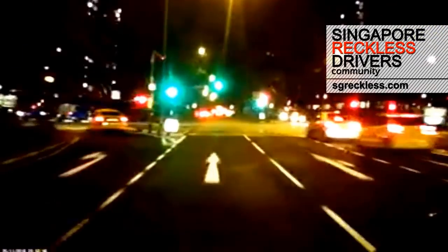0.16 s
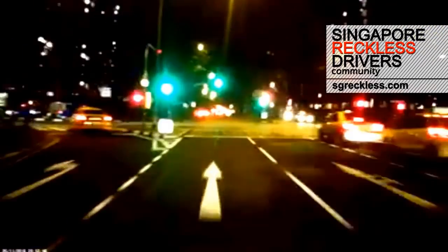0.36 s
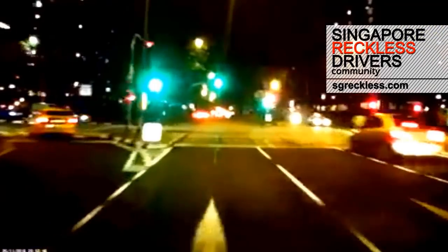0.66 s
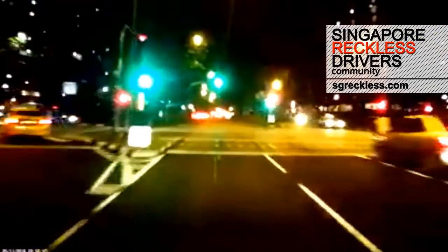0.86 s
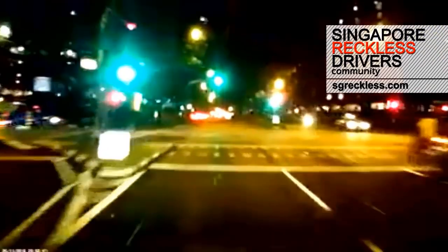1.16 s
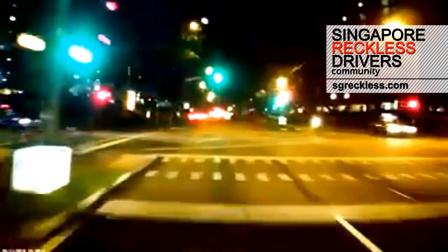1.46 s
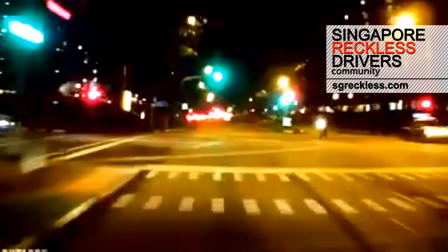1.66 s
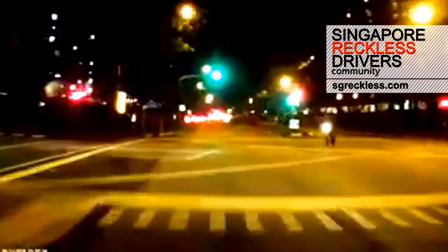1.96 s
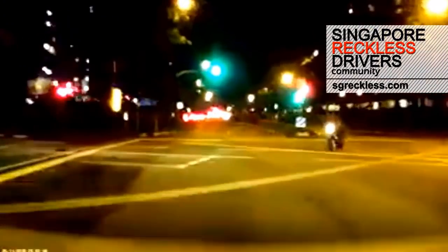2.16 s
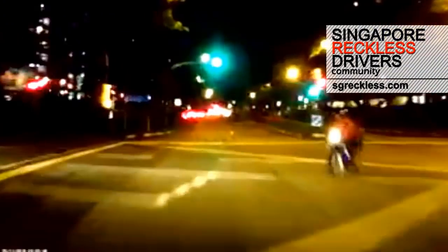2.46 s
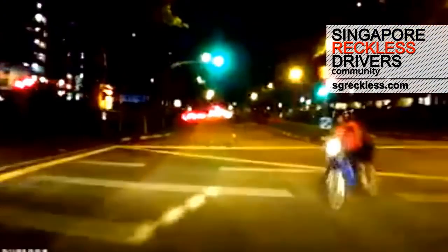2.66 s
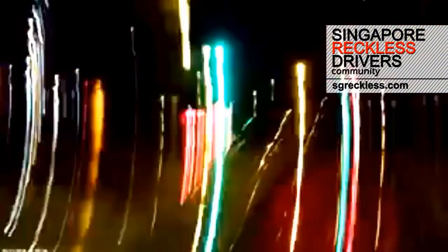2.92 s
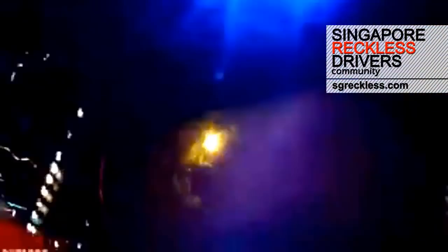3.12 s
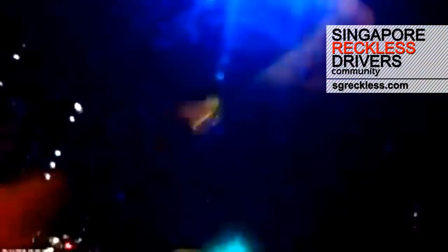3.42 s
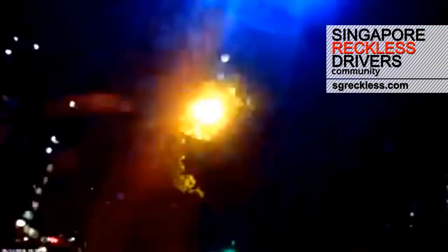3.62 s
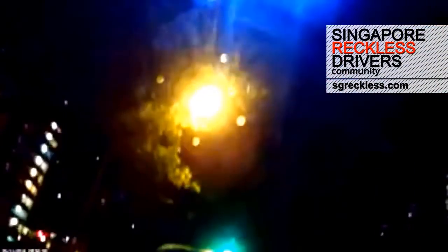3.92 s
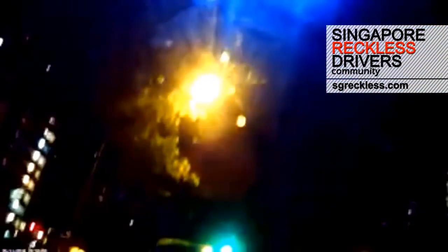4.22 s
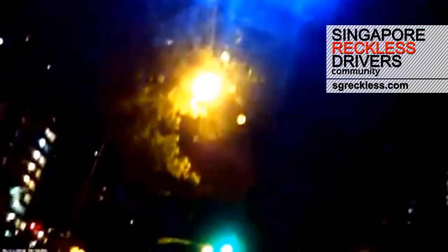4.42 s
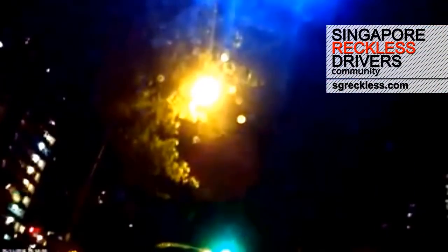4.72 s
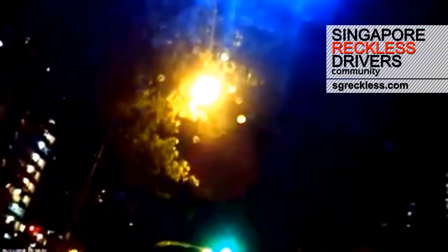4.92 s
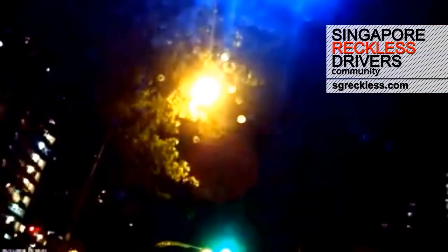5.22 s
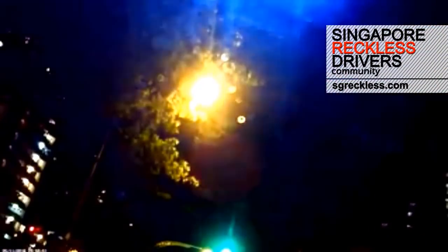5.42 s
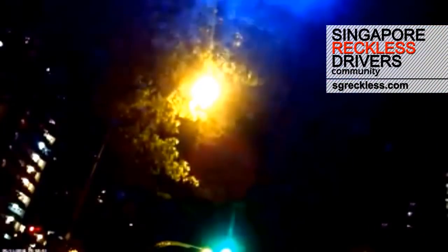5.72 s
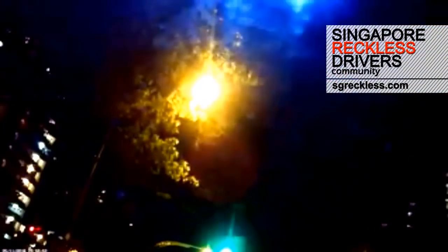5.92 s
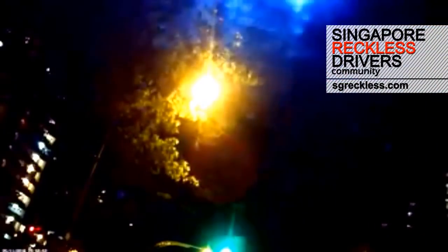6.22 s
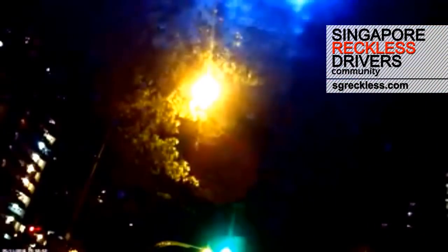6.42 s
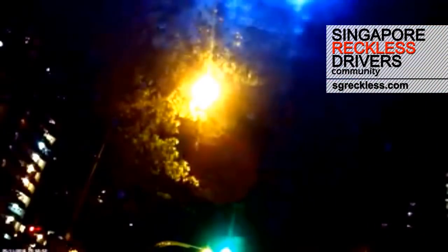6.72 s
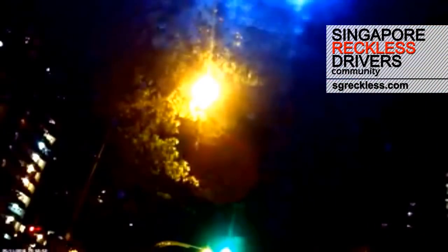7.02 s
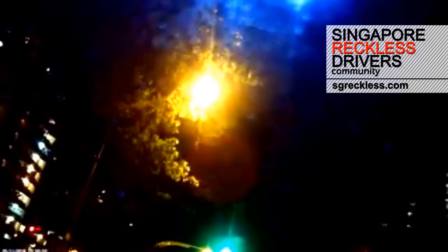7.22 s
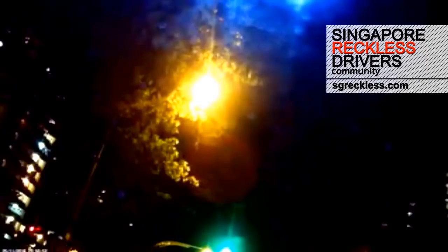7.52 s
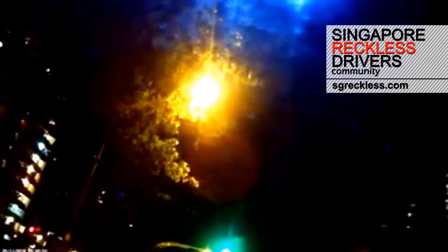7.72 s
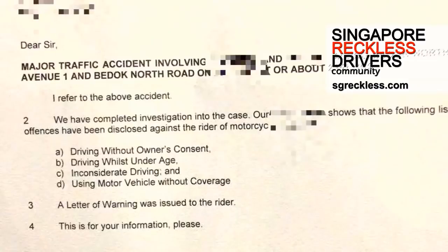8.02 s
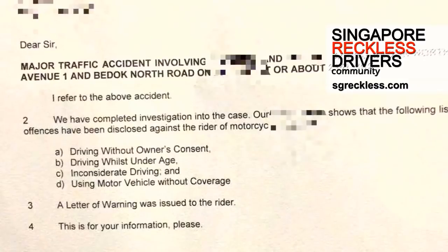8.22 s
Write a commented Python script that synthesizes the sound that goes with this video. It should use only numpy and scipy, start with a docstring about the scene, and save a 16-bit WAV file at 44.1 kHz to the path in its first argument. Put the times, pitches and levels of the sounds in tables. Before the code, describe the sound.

From inside a moving car, a steady low engine drone and road rumble are heard, with a faint high electronic whine and hiss throughout. A few deep thuds come from 3.3 seconds, and at 3.8 the tyres squeal briefly and start grinding. At about 4.1 seconds a very loud collision hits: rapid booming blows overload the microphone while panels crack, crumple and spray splinters. Around 4.8 seconds hard parts strike the windscreen three or four times, sharply. Heavy thuds and deep shuddering continue, with more short tyre squeals from 5.0 to 5.5. Loose objects tumble with hollow knocks as the car halts near 6 seconds. It is then much quieter: a fading low rumble as the car rocks, a soft idling throb and faint ticks of debris. Small plastic snaps and a soft bump come just before the sound ends at about 8 seconds.

```python
"""A car hits a motorcycle at a night-time junction, heard from a small camera on the windscreen.
First engine and road drone in the cabin, with the whine of the camera's electronics that lasts throughout.
The car brakes and its tyres squeal by stick-slip friction. Blows then excite the body's low modes and
overload the microphone, while panels crumple and fracture and hard parts crack against the glass.
Loose things tumble as the car stops; at last it rocks on its springs, the engine idles and debris settles."""
import sys
import numpy as np
from scipy import signal
from scipy.fft import rfft, irfft
from scipy.io import wavfile
from scipy.ndimage import uniform_filter1d

SR = 44100
rng = np.random.default_rng(int(sys.argv[2]) if len(sys.argv) > 2 else 0)


def generate_wav(sig):
    """Save sig (samples, or channels by samples) to the path in sys.argv[1] as 16-bit PCM at SR."""
    pcm = np.round(np.clip(np.atleast_2d(sig).T, -1, 1) * 32767).astype(np.int16)
    wavfile.write(sys.argv[1], SR, pcm)


N = 369116
TIME = np.arange(N) / SR
BRAKE_S, IMPACT_S, HALT_S, END_S = 3.8, 4.15, 5.95, 8.065

# Impacts: start_s, level_db
BODY_BLOWS = [(.63, -31.5), (3.690, -22), (4.060, 6.5), (4.103, 10), (4.160, 1), (4.226, 4.5), (4.331, 6),
              (4.412, -4.5), (4.675, -4), (4.778, -7), (6.3, -34), (6.865, -35), (7.938, -29)]  # bumps and heavy blows on the body
PANEL_FRACTURES = [(4.0765, -9), (4.112, -19), (4.135, -8), (4.1445, -14), (4.1865, -1.5), (4.190, -2.5),
                   (4.2005, -17), (4.2125, -5), (4.2275, -7), (4.3312, -10), (4.347, -15)]  # panels breaking
GLASS_STRIKES = [(4.7777, -1), (4.8221, -2.5), (4.8551, -3), (4.8835, -12.5)]  # hard parts striking the windscreen
CABIN_KNOCKS = [(.645, -41.5), (3.592, -33), (3.692, -18.5), (4.110, -4), (4.19, -6.5), (4.414, -17),
                (4.594, -16), (4.651, -20), (4.698, -13), (5.782, -14.5), (5.862, -18), (5.887, -19.5),
                (5.902, -20), (5.955, -16), (6.0, -25), (6.578, -47.5), (7.936, -40)]  # loose things knocking in the cabin
TRIM_SNAPS = [(3.690, -36.5), (5.599, -34), (5.617, -41), (6.895, -57), (7.255, -55), (7.596, -51),
              (7.671, -40.5), (7.899, -43.5), (7.930, -42)]  # small plastic parts snapping
# Deep thuds of suspension and floor: start_s, pitch_hz, level_db
FLOOR_THUDS = [(3.28, 31.7, -8.5), (3.44, 110, -25.5), (3.598, 112.4, -11), (3.934, 60.5, -6),
               (4.917, 56.4, -4), (5.044, 109, -11), (5.13, 67.4, -5), (5.19, 112, -7.5),
               (5.248, 124, -6.5), (5.319, 53.4, -3.5), (7.930, 87.3, -20), (7.933, 293, -31)]
# Strikes on a metal part: start_s, level_db, t60_s
METAL_STRIKES = [(3.692, -50, 1.0), (4.86, -54.5, 3.4)]
# Panels folding and scraping: start_s, hold_s, level_db
PANEL_FOLDS = [(3.815, .015, -41), (3.904, .14, -43), (4.14, .32, -35), (4.253, .025, -25.5),
               (4.48, .015, -30), (4.699, .015, -30), (4.797, 0.092, -41.5), (5.752, 0.017, -36)]
# Tyre squeals: start_s, span_s, nominal_pitch_hz, level_db, pitch_scatter_ratio
TYRE_SQUEALS = [(3.779, .12, 1193, -35.5, 0.05), (3.861, .17, 1190, -33.5, .1),
                (5.044, 0.042, 1177, -25, .02), (5.166, .38, 1226, -35.5, 0.02)]
# Engine drone in the cabin: time_s, firing_hz, level_db
ENGINE_CURVE = [(0, 41.02, -29.5), (.8, 45.35, -27.5), (2.2, 45.5, -27), (3.3, 43.01, -25.5),
                (3.7, 42.2, -36)]

# Broad modes of the car body: pitch_hz, bandwidth_hz, relative_db
BODY_MODES = [(74, 17, -3), (124, 38, 3.5), (163.6, 29, 7), (230, 55, -0.5), (316.7, 22, -8),
              (456.5, 56, -12.5), (700, 130, -24), (1210, 1100, -28.5)]
# Modes of the plastic trim: pitch_hz, relative_db, t60_s
TRIM_MODES = [(2600, -3, .02), (3075, -5, .04), (3490, -3, .03), (4870, -0.5, 0.028)]
# Line spectra: pitch_hz, relative_db
GLASS_MODES = [(651.4, -32), (1367, -33), (1787, -37), (2250, -40), (2649, -35.5), (2702, -32.5),
               (3063, -33), (3278, -31), (3618, -33), (3887, -35), (4064, -35), (4194, -32.5),
               (4527, -35.5), (5157, -45.5), (5900, -40.5), (6745, -45)]  # the windscreen
METAL_MODES = [(2660, -5.5), (3285, -2.5), (4020, -0.5), (4110, -7.5)]  # the ringing metal part
WHINE_LINES = [(7714, -78.5), (7779, -79), (7838, -68.5), (7897, -56.5), (7957, -74)]  # the camera's electronics

# Continuous spectra: frequency_hz, relative_density_db
SWAY_SPECTRUM = [(12, -27), (22, 6), (36, 9), (46, 7), (65, -16), (120, -57.5)]  # chassis swaying
DRUM_SPECTRUM = [(45, -23.5), (80, -5), (125, -0.5), (170, -4.5), (230, -9.5), (330, -18), (500, -23),
                 (800, -32.5), (1500, -48.5), (4000, -73.5)]  # roof and doors drumming
SCRAPE_SPECTRUM = [(200, -11.5), (500, 3), (900, -2.5), (1700, -11), (2800, -9), (5000, -14.5),
                   (9000, -19.5), (15500, -24)]  # panels scraping
FRACTURE_SPECTRUM = [(300, -1), (900, 8), (1800, -4.5), (3000, 1.5), (4200, -3.5), (6000, -7),
                     (9000, -14.5), (15500, -24.5)]  # panels breaking
CONTACT_SPECTRUM = [(200, -9.5), (600, -3), (1000, -5.5), (1400, -1.5), (1900, -8), (3200, -1), (4200, -5),
                    (5200, -12), (8000, -20), (15000, -30)]  # hard contact with glass
SPLINTER_SPECTRUM = [(3000, -20), (8000, -7), (12500, 0), (15500, -1)]  # flying splinters
HOLLOW_SPECTRUM = [(150, -22), (260, 8.5), (400, 2.5), (520, -1.5), (680, 3), (860, -3), (1100, -14.5),
                   (1800, -22), (2700, -26.5), (6000, -34.5), (15000, -41)]  # hollow objects and dashboard
PLASTIC_SPECTRUM = [(600, -3), (1700, -9), (3000, -5), (5300, -3.5), (8000, -3.5), (11000, -9.5),
                    (15500, -13)]  # plastic trim
GRIND_SPECTRUM = [(300, -5), (800, 0), (1300, -1), (1800, -8), (2600, -3.5), (3200, -9.5), (4100, -7.5),
                  (5200, -17), (9000, -23), (15000, -32)]  # rubber grinding on asphalt
ROAD_SPECTRUM = [(15, -6.5), (24, -3), (38, -8), (65, -17.5), (100, -17.5), (190, -28), (310, -27.5),
                 (360, -39), (450, -33), (620, -43.5), (930, -41.5), (1150, -53.5), (2000, -62),
                 (5000, -70)]  # road noise in the cabin
MURMUR_SPECTRUM = [(15, -3.5), (30, 5), (70, -11), (130, -10.5), (200, -17.5), (310, -14), (380, -34),
                   (460, -19), (600, -28.5)]  # cabin of the halted car
DEBRIS_SPECTRUM = [(1000, -6), (2500, -0.5), (3800, -4), (6000, -13), (13000, -10)]  # small debris settling
HISS_SPECTRUM = [(500, 2.5), (2500, -3.5), (4500, -4.5), (7000, -2.5), (7850, 6.5), (9000, -5), (11000, -9),
                 (15000, -5.5)]  # electronic hiss


def body_blows():
    """Impact excitation: blows set the body's broad low modes booming; thuds are a few damped cycles."""
    # A mode's decay time is inversely proportional to its bandwidth.
    modes = [(hz, db + 20 * np.log10(width), np.log(1000) / (np.pi * width))
             for hz, width, db in BODY_MODES]
    boom = steady(through(rng.standard_normal(N), modal_response(modes)), window_s=.02)
    thuds = sum(np.sqrt(2) * np.sin(2 * np.pi * hz * (TIME - s)) * hits([(s, db)], t60_s=.14, rise_s=.0034)
                for s, hz, db in FLOOR_THUDS)
    jolts = BODY_BLOWS + [(s, db - 7) for s, db in CABIN_KNOCKS]  # knocks also jolt the body
    return boom * hits(jolts, t60_s=.125, rise_s=.0022) + thuds


def shudder():
    """Forced vibration: the chassis sways and the panels drum under impact, skid, judder and rocking."""
    heave = undb(-11) * swell(IMPACT_S, hold_s=.22, rise_db_per_s=148, fall_db_per_s=70.5)
    skid = undb(-13.5) * swell(IMPACT_S, hold_s=1.53, rise_db_per_s=17.5, fall_db_per_s=50)
    judder = undb(-21) * swell(BRAKE_S, hold_s=1.49, rise_db_per_s=500, fall_db_per_s=35)
    struck = undb(-13) * hits(BODY_BLOWS, t60_s=.75, rise_s=.004)
    rock = rocking()
    sway = steady(noise(SWAY_SPECTRUM), window_s=.12) * power_sum(heave, skid, rock)
    drum = steady(noise(DRUM_SPECTRUM), window_s=.054) * power_sum(judder, struck, undb(-12) * rock)
    return sway * undb(2.6 * wander(12)) + drum


def rocking():
    """Damping: the envelope of the halted car's rocking on its springs decays exponentially."""
    return undb(-30.5) * swell(HALT_S, hold_s=0, rise_db_per_s=58, fall_db_per_s=11.5)


def windscreen():
    """Free vibration: hard contacts chatter against the glass, whose modes ring on briefly."""
    force = rng.standard_normal(N) * hits(GLASS_STRIKES, t60_s=.058, rise_s=.00016)
    force *= undb(.74 * wander(500))
    contact = through(force, spectral_response(CONTACT_SPECTRUM))
    ringing = through(force, modal_response([(hz, db, .044) for hz, db in GLASS_MODES]))
    return undb(-2) * contact + undb(-13.5) * ringing


def fractures():
    """Sudden stress release: panels break with dry cracks; a struck metal part rings in its modes."""
    breaks = noise(FRACTURE_SPECTRUM) * hits(PANEL_FRACTURES, t60_s=.0145, rise_s=.000079)
    breaks *= undb(2.9 * wander(640))
    metal = sum(undb(db + 2 * wander(24)) * np.sin(phase_of(hz * (1 + .0012 * wander(33))))
                for hz, db in METAL_MODES)
    return breaks + unit(metal) * decays(METAL_STRIKES, rise_s=.004)


def crumple(grains_per_s=2500):
    """Shot noise: tiny fractures of uneven size crowd over a scrape as panels fold and wreckage slides."""
    occurs = rng.random(N) < grains_per_s / SR
    size_db = 2.8 * np.minimum(rng.exponential(size=N), 4)
    grains = occurs * rng.choice([-1, 1], N) * undb(size_db)
    force = unit(unit(grains) + .49 * rng.standard_normal(N))
    folds = [undb(db) * swell(s, hold_s, rise_db_per_s=298.5, fall_db_per_s=200.5)
             for s, hold_s, db in PANEL_FOLDS]
    slide = undb(-45.5) * swell(HALT_S - .24, hold_s=.24, rise_db_per_s=56, fall_db_per_s=152)
    scrape = through(force, spectral_response(SCRAPE_SPECTRUM))
    return scrape * power_sum(*folds, slide) * undb(2.4 * wander(90))


def splinters():
    """Small bodies radiate high frequencies: fragments spray off the impact as bright, flickering noise."""
    spray = swell(IMPACT_S, hold_s=.28, rise_db_per_s=300, fall_db_per_s=150)
    return noise(SPLINTER_SPECTRUM) * spray * undb(-40 + 2.5 * wander(70))


def loose_things():
    """Damped resonance: tumbling objects and the dashboard knock hollowly; trim snaps and rattles."""
    dashboard = undb(-17.5) * hits(GLASS_STRIKES, t60_s=.55, rise_s=.0015)
    tumbles = hits(CABIN_KNOCKS, t60_s=.098, rise_s=.00143)
    knocks = steady(noise(HOLLOW_SPECTRUM), window_s=.01) * power_sum(tumbles, dashboard)
    plastic = noise(PLASTIC_SPECTRUM)
    plastic += undb(-5) * through(rng.standard_normal(N), modal_response(TRIM_MODES))
    snaps = hits(TRIM_SNAPS, t60_s=.13, rise_s=.0016)
    rattle_hits = [(when * BRAKE_S, -57 - 10 * softness) for when, softness in rng.random((12, 2))]
    rattles = hits(rattle_hits, t60_s=.14, rise_s=.01)
    return knocks + plastic * (snaps + rattles) * undb(.77 * wander(300))


def squeals(rise_share=.27, sag_hz_per_db=1.1):
    """Stick-slip oscillation: the tread sounds two close, unsteady tones whose pitch follows the swell."""
    low_jitter, high_jitter, waver = wander(260), wander(260), .006 * wander(30)
    high_gain = undb(-7 + 5.7 * wander(27))
    sound = np.zeros(N)
    for start_s, span_s, nominal_hz, db, scatter in TYRE_SQUEALS:
        age = np.maximum(TIME - start_s, 0) / (rise_share * span_s)
        envelope = (age * np.exp(1 - age)) ** 2
        hz = nominal_hz + sag_hz_per_db * 20 * np.log10(np.maximum(envelope, .05))
        low_phase = phase_of(hz * .975 * (1 + scatter * low_jitter + waver))
        high_phase = phase_of(hz * 1.07 * (1 + 2 * scatter * high_jitter))
        tones = np.sin(low_phase) + high_gain * np.sin(high_phase) + undb(-20) * np.sin(2 * low_phase)
        sound += undb(db) * envelope * unit(tones)
    return sound * undb(2.8 * wander(90))


def tyre_grind(hum_hz=406):
    """Sliding friction: rubber grinds on asphalt and fades as the car slows; a faint hum swells late."""
    sliding = swell(BRAKE_S, hold_s=1.5, rise_db_per_s=89, fall_db_per_s=26)
    grind = noise(GRIND_SPECTRUM) * undb(-46 + 1.7 * wander(50)) * sliding
    phase = phase_of(hum_hz * (1 + .0027 * wander(20)))
    hum = undb(-39) * unit(np.sin(phase) + undb(-14.5) * np.sin(2 * phase))
    return grind + hum * swell(5.3, hold_s=.39, rise_db_per_s=35.5, fall_db_per_s=140)


def engine_drone():
    """Periodic forcing: the engine drives the cabin at its firing rate until the driver brakes."""
    firing_hz, level_db = curves(ENGINE_CURVE)
    phase = phase_of(firing_hz * (1 + .025 * wander(8.3)))
    drone = unit(np.sin(phase) + undb(-30.5) * np.sin(2 * phase)) * undb(level_db + 1.1 * wander(21))
    return drone * swell(0, hold_s=BRAKE_S, rise_db_per_s=0, fall_db_per_s=201)


def road_rumble():
    """Random forcing: the road rumbles until the halt, then the floor rumbles with the rocking."""
    rolling = undb(-30) * swell(0, hold_s=HALT_S, rise_db_per_s=0, fall_db_per_s=78)
    return noise(ROAD_SPECTRUM) * power_sum(rolling, undb(-9.5) * rocking()) * undb(.87 * wander(11))


def engine_idle(firing_hz=31.7):
    """Nearly periodic forcing: slow firing makes the halted car throb, then fades."""
    phase = phase_of(firing_hz * (1 + .036 * wander(9)))
    throb = unit(np.sin(phase) + undb(-19) * np.sin(4 * phase)) * undb(-36.5 + 1.4 * wander(8))
    return throb * swell(HALT_S, hold_s=1.16, rise_db_per_s=101.5, fall_db_per_s=57)


def settling_debris(settle_s=1.1):
    """Random impacts: debris settles in ticks and soft knocks over the low murmur of the halted car."""
    murmur = noise(MURMUR_SPECTRUM) * undb(-48.5 + 1.4 * wander(22)) * np.clip(TIME - HALT_S, 0, 1)
    landings = [(HALT_S + when * settle_s, 8 - 10 * softness) for when, softness in rng.random((18, 2))]
    ticks = hits(landings, t60_s=.063, rise_s=.002)
    debris = noise(DEBRIS_SPECTRUM) * (ticks + .57) + undb(7) * noise(HOLLOW_SPECTRUM) * ticks
    return murmur + undb(-63) * debris * swell(HALT_S, settle_s, rise_db_per_s=200, fall_db_per_s=20)


def electronics():
    """Modulation sidebands: a thin whine, split into lines by the camera's frame rate, over faint hiss."""
    whine = sum(undb(db) * unit(np.sin(phase_of(hz) + rng.uniform(0, 2 * np.pi)))
                for hz, db in WHINE_LINES)
    return undb(-5.5) * whine + noise(HISS_SPECTRUM) * undb(-65 + .7 * wander(12))


def cabin(x, t60_s, wet_db):
    """Reverberation: the small padded cabin adds a short, dull tail."""
    t = TIME[:SR // 2]
    tail = rng.standard_normal(len(t)) * np.exp(-np.log(1000) * t / t60_s) * (t > .004)
    tail = signal.sosfilt(signal.butter(1, 4500, fs=SR, output="sos"), tail)
    return x + undb(wet_db) * through(x, tail / np.linalg.norm(tail))


def overload(x, ceiling):
    """Saturation: the microphone rounds large pressure swings into flat tops."""
    return x / (1 + (x / ceiling) ** 8) ** (1 / 8)


def undb(db):
    """Amplitude ratio of a level in decibels."""
    return 10 ** (np.asarray(db) / 20)


def unit(x):
    """Normalisation to rms 1."""
    return x / np.sqrt(np.mean(x ** 2))


def steady(x, window_s):
    """Normalisation of the short-time rms to about 1."""
    return x / np.sqrt(np.abs(uniform_filter1d(x ** 2, max(int(window_s * SR), 2))) + 1e-12)


def power_sum(*envelopes):
    """Incoherent addition: envelopes combine in power."""
    return np.linalg.norm(envelopes, axis=0)


def curves(rows):
    """Linear interpolation of a table's columns in time."""
    time_s, *columns = np.transpose(rows)
    return [np.interp(TIME, time_s, column) for column in columns]


def phase_of(hz):
    """Phase as the time integral of frequency."""
    return 2 * np.pi * np.cumsum(hz * np.ones(N)) / SR


def spectral_response(points, size=8192):
    """Minimum-phase impulse response of unit energy; its spectrum falls away above the last point."""
    hz, db = np.transpose(points)
    bins_hz = np.maximum(np.fft.rfftfreq(size, 1 / SR), 1)
    gain = undb(np.interp(np.log(bins_hz), np.log(hz), db)) * np.minimum(hz[-1] / bins_hz, 1) ** 2
    cepstrum = irfft(np.log(gain))
    cepstrum[1:size // 2] *= 2  # folding the cepstrum makes the response causal
    cepstrum[size // 2 + 1:] = 0
    response = irfft(np.exp(rfft(cepstrum)))
    return response / np.linalg.norm(response)


def modal_response(modes):
    """Modal superposition: damped sines (pitch_hz, relative_db, t60_s), scaled to unit energy."""
    t = TIME[:SR // 2]
    response = sum(undb(db) * np.sin(2 * np.pi * hz * t) * np.exp(-np.log(1000) * t / t60_s)
                   for hz, db, t60_s in modes)
    return response / np.linalg.norm(response)


def through(force, response):
    """Convolution of a force with an impulse response."""
    return signal.fftconvolve(force, response)[:N]


def noise(points):
    """Spectral shaping of white noise, at rms 1."""
    return unit(through(rng.standard_normal(N), spectral_response(points)))


def wander(rate_hz):
    """Random modulation of rms 1: steps held for 1 / rate_hz and smoothed twice."""
    hold = max(int(SR / rate_hz), 1)
    steps = np.repeat(rng.standard_normal(N // hold + 1), hold)
    return unit(uniform_filter1d(uniform_filter1d(steps, hold), hold)[:N])


def swell(start_s, hold_s, rise_db_per_s, fall_db_per_s):
    """Exponential growth to 1 at start_s, a hold, then exponential decay."""
    early_s, late_s = np.maximum(start_s - TIME, 0), np.maximum(TIME - start_s - hold_s, 0)
    return undb(-np.minimum(rise_db_per_s * early_s + fall_db_per_s * late_s, 200))


def decays(rows, rise_s):
    """Exponential decay after a quick rise: impacts (start_s, level_db, t60_s) summed in power."""
    power = np.zeros(N)
    for start_s, db, t60_s in rows:
        start = int(start_s * SR)
        t = TIME[:min(int(2 * t60_s * SR), N - start)]
        envelope = undb(db) * (1 - np.exp(-t / rise_s)) * np.exp(-np.log(1000) * t / t60_s)
        power[start:start + len(t)] += envelope ** 2
    return np.sqrt(power)


def hits(rows, t60_s, rise_s):
    """Equal damping: the envelope of impacts (start_s, level_db) that share one decay time."""
    return decays([(s, db, t60_s) for s, db in rows], rise_s)


def scene():
    """Superposition at the microphone: the deep sounds saturate and the sharp ones reverberate."""
    deep = overload(engine_drone() + road_rumble() + engine_idle() + shudder() + body_blows(), ceiling=.9)
    sharp = windscreen() + fractures() + splinters() + loose_things() + crumple()
    sharp = cabin(sharp, t60_s=.15, wet_db=-19.5)
    return (deep + sharp + tyre_grind() + squeals() + settling_debris() + electronics())[None]


def record(dry, cutoff_hz=15800):
    """Amplitude and band limiting: peaks stop at full scale, the top is cut, and the sound ends abruptly."""
    gate = np.clip((END_S - TIME) / .0057, 0, 1)
    lowpass = signal.ellip(8, .2, 70, cutoff_hz, fs=SR, output="sos")
    return signal.sosfilt(lowpass, np.clip(dry, -1, 1) * gate)


dry = scene()
out = record(dry)
generate_wav(out)
```